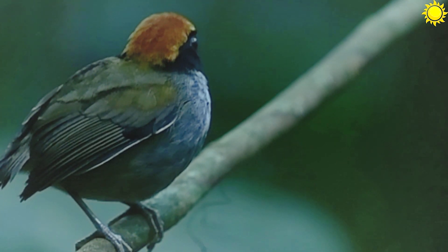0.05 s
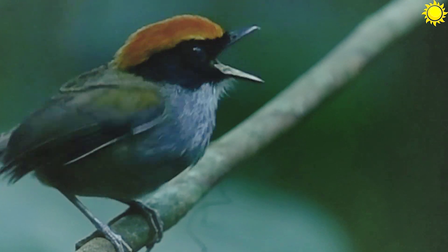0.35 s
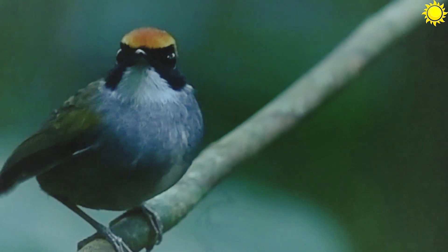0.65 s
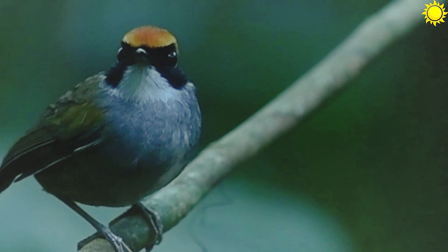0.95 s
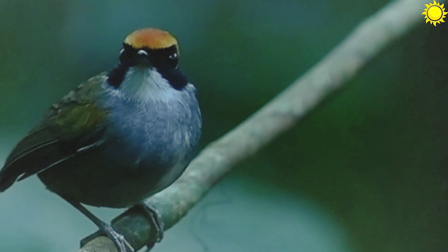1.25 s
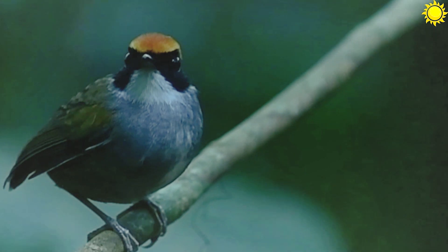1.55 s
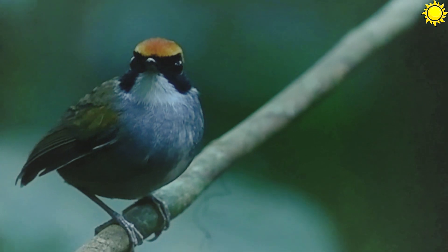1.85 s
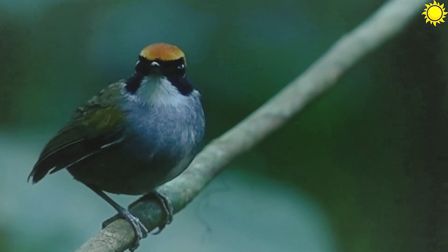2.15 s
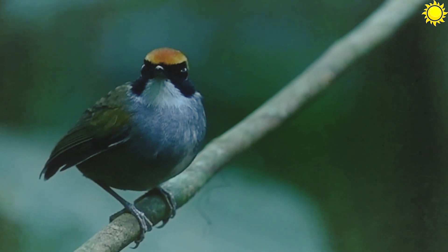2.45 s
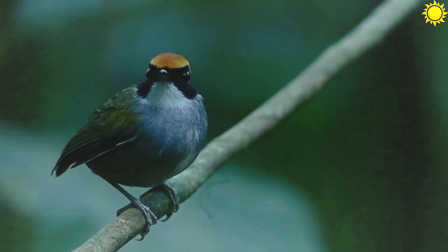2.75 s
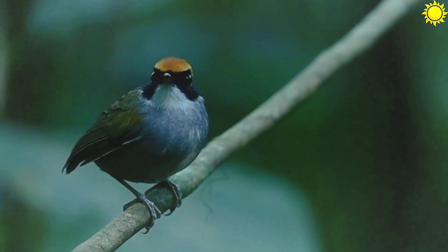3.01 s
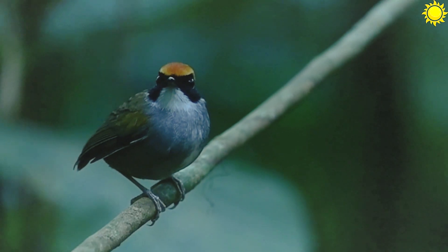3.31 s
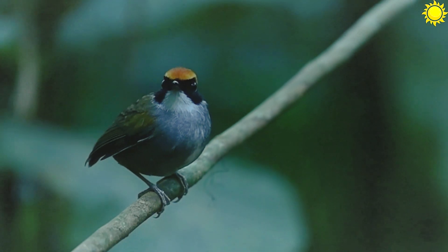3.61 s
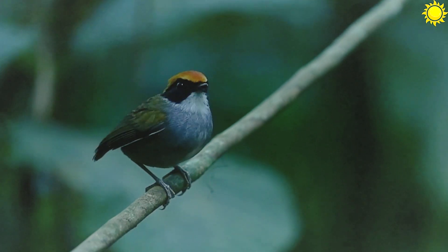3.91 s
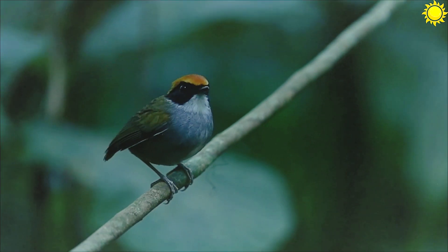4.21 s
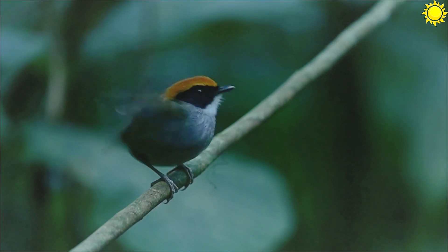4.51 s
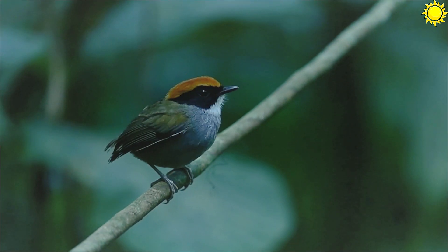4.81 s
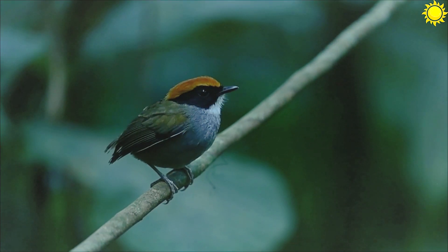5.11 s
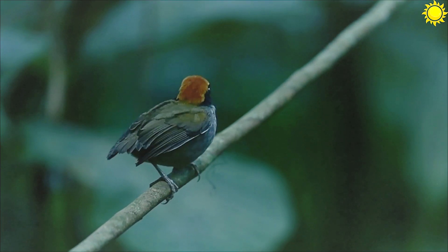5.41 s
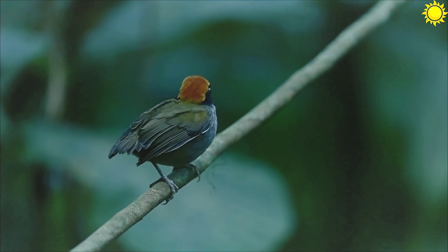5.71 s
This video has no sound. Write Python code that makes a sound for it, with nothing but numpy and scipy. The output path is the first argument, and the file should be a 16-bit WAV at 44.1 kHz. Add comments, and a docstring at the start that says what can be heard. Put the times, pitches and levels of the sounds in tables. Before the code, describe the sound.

A soft, steady rush of distant forest air runs throughout, with a barely audible low drone drifting beneath it. A faint brush of feathers opens the first moments. At about 0.3 seconds a small bird, close and near the centre, gives a sharp, high screech, only a tenth of a second long, that starts raspy, rises and clears into a whistle tipped with a thin pip. At 1.5 seconds comes a quieter, very short chip that dives in pitch. Feathers stir faintly around 2.2 seconds. Another chip at 3.3 seconds is quickly followed at 3.7 by a second rasping, rising screech, the loudest call. A last falling chip sounds at 5.2 seconds, with a tiny feather swish just after. Stems, leaves and trees scatter every call back in an echo of about half a second.

```python
"""A soft distant rush and a faint rustle of feathers come first, then a gnateater screeches from a branch.
Its syrinx gives two rasping, rising screeches that clear into a whistle, the first tipped with a thin
pip, and three short chips that dive in pitch. Nearby stems, leaves and the forest scatter each call back.
Under it all drifts a very faint, low drone."""
import sys
import numpy as np
from scipy import signal
from scipy.fft import rfft, irfft, next_fast_len
from scipy.io import wavfile
from scipy.ndimage import map_coordinates

SR = 44100
rng = np.random.default_rng(int(sys.argv[2]) if len(sys.argv) > 2 else 0)


def output_pcm(signal):
    """Save a mono or channel-first signal as 16-bit PCM at the path in sys.argv[1].

    Samples are clipped to [-1, 1] before scaling.
    """
    pcm = np.clip(np.atleast_2d(signal).T, -1, 1) * 32767
    wavfile.write(sys.argv[1], SR, np.round(pcm).astype(np.int16))


N = 262836

# colour of the distant rush: (frequency [Hz], relative level [dB])
RUSH_EQ = [(15, -62), (25, -26.5), (55, -21), (107, -17), (144, -14.5), (211, -12.5), (248, -6),
           (291, -8.5), (352, -4.5), (604, -3), (749, 0), (1090, -3), (3220, -15.5), (11400, -23),
           (15800, -31)]
# stereo image of the rush: (frequency [Hz], left-right likeness [0-1])
RUSH_LIKENESS = [(60, .93), (290, .97), (640, .85), (1410, .37), (3100, 0)]
# drift of the drone: (time [s], pitch [Hz], level [dB])
DRONE_PATH = [(0, 38.1, -92.5), (1.3, 59.2, -84), (1.7, 54.64, -82), (2.3, 63.1, -79), (4.4, 72.05, -96.5),
              (5.1, 61.8, -83.5), (5.9, 50.78, -76)]
# early reflections off nearby stems: (delay [s], gain [dB])
STEM_ECHOES = [(.0068, -14.5), (0.013, -14.5), (.024, -24.5)]
# reverb tail of the trees: (frequency [Hz], time to fall 60 dB [s])
TREE_DECAY = [(1000, .5), (4500, .6), (8500, .52), (14000, .32)]
# what the foliage sends back: (frequency [Hz], gain [dB])
FOLIAGE_EQ = [(1000, -2), (2300, -3), (3500, 1), (5000, -2), (8500, -4), (11500, -2.5), (14000, -3.5)]
# the bird's pan: (frequency [Hz], left minus right [dB])
BIRD_PAN = [(4500, 0), (8500, -1), (13000, -6)]
# feather swishes: (centre time [s], level [dB], half-width [s])
RUSTLES = [(.049, -64, 0.0066), (.078, -54, .012), (.098, -62, .02), (.15, -62.5, 0.025),
           (2.187, -62.5, 0.0096), (2.246, -63, .01), (5.544, -64.5, .01)]
# colour of brushing feathers: (frequency [Hz], relative level [dB])
FEATHER_EQ = [(1500, -19), (4000, -8), (8000, -4), (11500, -9), (15500, -16.5)]
# resonances of the vocal tract: (frequency [Hz], gain [dB])
THROAT_EQ = [(5000, -3.5), (6500, -2), (8400, 0), (10000, -4.5), (11200, -17.5), (13000, -6.5),
             (15000, -33.5)]
# chip cues: (time [s], length [s], base level [dB], base pitch [Hz], sag [Hz/s], hiss level [dB],
# opening hiss boost [dB], hiss tilt [dB/octave], upper voice base gain [dB], upper voice offset [Hz])
CHIPS = [(1.503, 0.037, -26.5, 4850, 43000, -44.5, 7.5, 5, -7.5, 1500),
         (3.332, .041, -29, 4885, 21100, -47, 0.5, 0.5, -16, 1892),
         (5.235, .041, -29, 5078, 47580, -42, -6, 4, -3, 1042)]
# colour of a chip's hiss before its tilt: (frequency [Hz], relative level [dB])
CHIP_HISS_EQ = [(300, -50.5), (1200, -14.5), (2500, -6), (6000, 3), (8700, -5), (11000, -2.5), (13500, -8),
                (15500, -18)]
# screech cues: (time [s], length [s], time until it clears [s], base level [dB], base rasp pitch [Hz],
# whistle pitch [Hz], whistle gain [dB], reverb send [dB])
SCREECHES = [(.327, .098, .081, -16, 3773, 4977, -2, 6.5), (3.74, .109, .082, -12.5, 3880, 4881, 0, 1.5)]
# colour of the noise riding on a screech: (frequency [Hz], relative level [dB])
RASP_EQ = [(400, -73), (950, -28), (2000, -29), (2900, -20.5), (3700, -7.5), (4800, -11.5), (5800, -6),
           (7400, 2.5), (8800, -4), (10300, -11.5), (12800, -12.5), (15500, -13.5)]
# colour of the low crack as a screech bursts open: (frequency [Hz], relative level [dB])
CRACK_EQ = [(600, -20.5), (1500, -4), (2800, 1.5), (4500, -4), (9000, -14), (15000, -24)]


def amp(db):
    """Decibels to gain."""
    return 10 ** (np.asarray(db) / 20)


def unit(x):
    """x at rms 1."""
    return x / np.sqrt(np.mean(x ** 2) + 1e-20)


def along(points, hz):
    """(frequency [Hz], value) points read on a log axis."""
    freqs, values = np.transpose(points)
    return np.interp(np.log(hz + 1), np.log(freqs), values)


def wobble(rate, size):
    """A smooth random modulator, rate knots a second."""
    knots = rng.standard_normal(int(size * rate / SR) + 4)
    return map_coordinates(knots, [np.arange(size) * rate / SR])


def phase_of(hz):
    """Oscillator phase for a moving pitch."""
    return 2 * np.pi * np.cumsum(hz) / SR


def filtered(x, response):
    """x through an EQ given as gain against frequency."""
    size = x.shape[-1]
    padded = next_fast_len(size + 8192)
    return irfft(rfft(x, padded) * response(np.fft.rfftfreq(padded, 1 / SR)), padded)[..., :size]


def noise(eq, size):
    """Coloured noise of rms 1."""
    return unit(filtered(rng.standard_normal(size), lambda hz: amp(along(eq, hz))))


def fade(size, ramp_s=.002):
    """A short fade in and out."""
    to_edge_s = np.minimum(np.arange(size), np.arange(size)[::-1]) / SR
    return np.minimum(to_edge_s / ramp_s, 1)


def add(track, start, sound):
    """Mix a sound into a track from start seconds on."""
    part = track[max(0, round(start * SR)):][:len(sound)]
    part += sound[:len(part)]


def distant_rush(level_db=-54.5, sway_db=.4):
    """A steady bed of air, centred in the bass and wide in the treble."""
    def width(hz):
        angle = np.arccos(along(RUSH_LIKENESS, hz)) / 2
        return np.array([np.cos(angle), np.sin(angle)])
    mid, side = filtered(np.array([noise(RUSH_EQ, N), noise(RUSH_EQ, N)]), width)
    return amp(level_db + sway_db * wobble(6.8, N)) * unit(np.array([mid + side, mid - side]))


def drone():
    """A low tone, perhaps a far engine, slowly rises and sinks."""
    t = np.arange(N) / SR
    times, pitches, levels = np.transpose(DRONE_PATH)
    hz = np.interp(t, times, pitches) * (1 + .02 * wobble(24, N))
    return np.sqrt(2) * amp(np.interp(t, times, levels)) * np.sin(phase_of(hz))


def forest_reverb(send, leaf_db=-13, tree_db=-17, leaf_t60_s=.22):
    """Distinct echoes from stems, a quick scatter from leaves and a long tail from the trees."""
    hz, t, _ = signal.stft(np.zeros(SR), SR, nperseg=256)
    build_up = 1 - np.exp(-(t / .01) ** 2)
    impulse = 0
    for db, t60 in [(leaf_db, leaf_t60_s), (tree_db, along(TREE_DECAY, hz)[:, None])]:
        scatter = signal.stft(rng.standard_normal((2, SR)), SR, nperseg=256)[2]
        tail = signal.istft(scatter * build_up * amp(-60 * t / t60), SR, nperseg=256)[1]
        impulse = impulse + amp(db) * tail / np.linalg.norm(tail, axis=1, keepdims=True)
    for delay, db in STEM_ECHOES:
        arrivals = np.abs(delay + rng.normal(0, .0002, 2))  # left and right land slightly apart
        impulse[[0, 1], (arrivals * SR).astype(int)] += amp(db)
    coloured = filtered(send, lambda f: amp(along(FOLIAGE_EQ, f)))
    return signal.fftconvolve(coloured[None], impulse, axes=1)[:, :N]


def pan_to_branch(bird, lag_s=1.6e-5):
    """The bird sits a little to the right, so the left side hears it later and duller."""
    left = lambda hz: amp(along(BIRD_PAN, hz) / 2) * np.exp(-1j * np.pi * hz * lag_s)
    return filtered(bird, lambda hz: np.array([left(hz), 1 / left(hz)]))


def feathers(grain_db=3):
    """Feathers brush each other in short, grainy swishes."""
    t = np.arange(N) / SR
    swell = sum(amp(db) * np.exp(-((t - centre) / width) ** 2) for centre, db, width in RUSTLES)
    return swell * unit(noise(FEATHER_EQ, N) * amp(grain_db * wobble(480, N)))


def pip(start=.429, length=.01, pitch_hz=5840, level_db=-23, jitter=.033):
    """The first screech ends by breaking upward into one thin, unsteady note."""
    track, size = np.zeros(N), round(length * SR)
    phase = phase_of(pitch_hz * (1 + jitter * wobble(900, size)))
    add(track, start, np.sqrt(2) * amp(level_db) * fade(size) * np.sin(phase))
    return track


def chip_gesture(t, length, pitch_hz, sag, top_hz=8200, end_hz=1846, dive_s=.0056,
                 attack_s=.0097, release_s=.015):
    """Pitch and envelope of a chip: it dives, sags, then collapses as the pressure runs out."""
    hz = pitch_hz - sag * t + (top_hz - pitch_hz) * np.exp(-(t / dive_s) ** 1.7)
    collapse = (t / length) ** 5.5
    attack_db = -24 * np.maximum(1 - t / attack_s, 0)
    release_db = -10 * np.maximum(1 - (length - t) / release_s, 0)
    return hz + collapse * (end_hz - hz), attack_db + release_db


def chips(overtone_db=(-18, -16), jitter=.028, upper_jitter=.0398, shimmer=.23, beak_hz=3210,
          snap_s=.012):
    """Steep two-voiced whistles from the syrinx; returns them and their edge of hiss and overtones."""
    whistles, edge = np.zeros((2, N))
    for start, length, level_db, pitch_hz, sag, hiss_db, snap_db, tilt_db, upper_db, offset_hz in CHIPS:
        t = np.arange(0, length, 1 / SR)
        size = len(t)
        hz, envelope_db = chip_gesture(t, length, pitch_hz, sag)
        phase = phase_of(hz * (1 + jitter * wobble(900, size)))
        overtones = sum(amp(db + along(THROAT_EQ, k * hz)) * np.sin(k * phase)
                        for k, db in enumerate(overtone_db, 2))
        # the other side of the syrinx sings higher and less steadily, and gains as the pitch falls
        upper_phase = phase_of((hz + offset_hz) * (1 + upper_jitter * wobble(1200, size)))
        upper = amp(upper_db) * np.clip(4000 / hz, .85, 1.15) ** 3 * np.sin(upper_phase)
        beak_db = 8 * np.minimum(np.log2(hz / beak_hz), 0)  # the small beak radiates less low end
        gain = np.sqrt(2) * amp(level_db + envelope_db + beak_db) * fade(size)
        gain *= 1 + shimmer * wobble(500, size)
        hiss_eq = [(f, db + tilt_db * np.log2(f)) for f, db in CHIP_HISS_EQ]
        hiss_gain = amp(hiss_db + envelope_db / 2 + snap_db * np.exp(-t / snap_s)) * fade(size)
        add(whistles, start, gain * (np.sin(phase) + upper))
        add(edge, start, gain * overtones + hiss_gain * noise(hiss_eq, size))
    return whistles, edge


def screech_gesture(t, clear_s, level_db, pitch_hz, whistle_hz, whistle_db,
                    scoop_hz=992, climb_hz_per_s=8000, swell_db=19.5, chaos_s=.007, settle_s=.055):
    """Pitch, level and rasp (0-1) of a screech: it scoops, swells and settles, then clears."""
    clear = (1 + np.tanh((t - clear_s) / .0064)) / 2  # crossfade into the whistle
    hz = pitch_hz + climb_hz_per_s * t - scoop_hz * np.exp(-t / .009)
    db = level_db - swell_db * np.exp(-t / .011) + whistle_db * clear
    rasp = np.exp(-np.maximum(t - chaos_s, 0) / settle_s)
    rasp += clear * (.066 - rasp)  # a trace of grit stays in the whistle
    return hz + clear * (whistle_hz - hz), db, rasp


def screech_tone(hz, rasp, flutter, vibrato=.045, jitter=.045, waver=.006, shimmer=.42,
                 squeak_ratio=1.17, squeak_db=-4):
    """The pitched layer: three harmonics from the syrinx, shaped by the throat and roughened by rasp."""
    size = len(hz)
    harsh = np.minimum(rasp / .45, 1)
    bend = rasp * (vibrato * flutter + jitter * wobble(2200, size)) + waver * wobble(500, size)
    phase = phase_of(hz * (1 + bend))
    # a harsh voice favours the overtones, which swell and sink with the flutter
    swing_db = 3 * harsh * flutter
    source_db = [-4 * harsh, -5 * (1 - harsh) - swing_db / 2, -2 - 16 * (1 - harsh) - swing_db]
    gains = amp([db + along(THROAT_EQ, k * hz) for k, db in enumerate(source_db, 1)])
    gains /= np.linalg.norm(gains, axis=0)
    partials = [gain * (1 + shimmer * harsh * wobble(900, size)) * np.sin(k * phase)
                for k, gain in enumerate(gains, 1)]
    # at each crest of the flutter the fundamental breaks upward into a ragged squeak
    crest = harsh * np.maximum(flutter, 0)
    squeak = amp(squeak_db) * np.sin(phase_of(squeak_ratio * hz * (1 + .07 * wobble(1800, size))))
    return sum(partials) + crest * (squeak - partials[0])


def screech_noise(hz, rasp, flutter, pitch_tracking=.7, pulse_db=4):
    """The noise layer: chaos in the syrinx climbs with the pitch and pulses with the flutter."""
    speed = hz ** pitch_tracking / np.mean(hz ** pitch_tracking)
    chaos = map_coordinates(noise(RASP_EQ, len(hz)), [np.cumsum(speed)], order=5)
    return chaos * unit(amp(pulse_db * (.93 - rasp) * flutter))


def screeches(flutter_hz=152, noise_db=-1, crack_db=-33, crack_s=.006):
    """The syrinx cracks open in chaos, settles to a fluttering tone, then whistles; one track each."""
    tracks = np.zeros((len(SCREECHES), N))
    for track, (start, length, *gesture, _) in zip(tracks, SCREECHES):
        t = np.arange(0, length, 1 / SR)
        hz, db, rasp = screech_gesture(t, *gesture)
        flutter = np.sin(phase_of(flutter_hz * (1 + .11 * wobble(91, len(t)))))
        tone = np.sqrt(2 * (1 - rasp ** 2)) * screech_tone(hz, rasp, flutter)
        grit = amp(noise_db) * rasp * screech_noise(hz, rasp, flutter)
        crack = amp(crack_db) * t / crack_s * np.exp(-t / crack_s) * noise(CRACK_EQ, len(t))
        add(track, start, fade(len(t)) * (amp(db) * (tone + grit) + crack))
    return tracks


def scene(pip_send_db=5, chip_send_db=7, edge_send_db=10):
    """The mix: the bird up front, the forest's answer around it, the rush and drone behind."""
    screech_tracks, pip_track, (whistles, edge) = screeches(), pip(), chips()
    bird = screech_tracks.sum(axis=0) + pip_track + whistles + edge + feathers()
    # a wide-open beak beams the screech forward; the chips spread more into the trees
    send = amp([send_db for *_, send_db in SCREECHES]) @ screech_tracks
    send += amp(pip_send_db) * pip_track + amp(chip_send_db) * whistles + amp(edge_send_db) * edge
    return pan_to_branch(bird) + forest_reverb(send) + distant_rush() + drone()


def record(dry):
    """A brick-wall low-pass on the master."""
    return filtered(dry, lambda hz: hz < 15900)


dry = scene()
out = record(dry)
output_pcm(out)
```